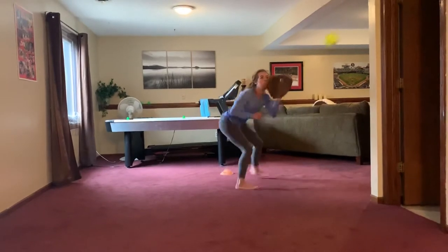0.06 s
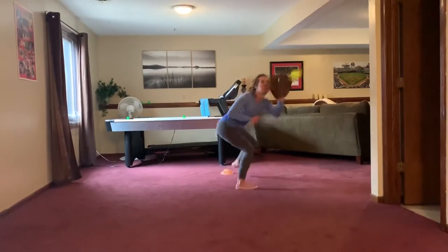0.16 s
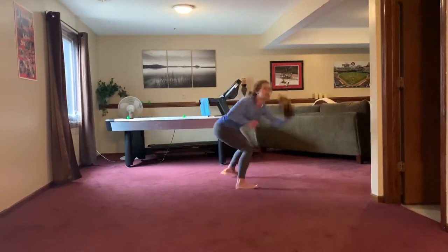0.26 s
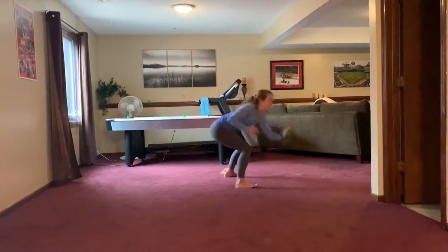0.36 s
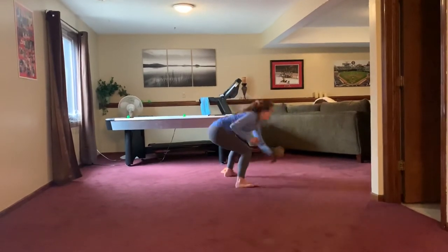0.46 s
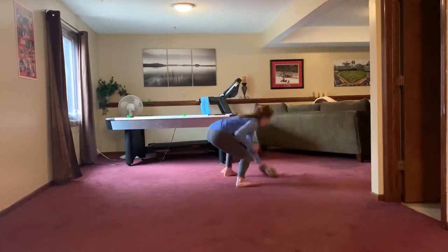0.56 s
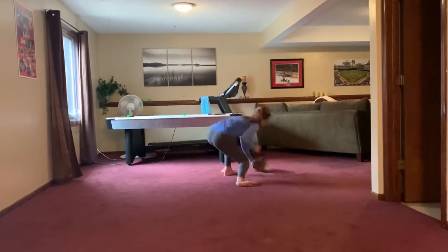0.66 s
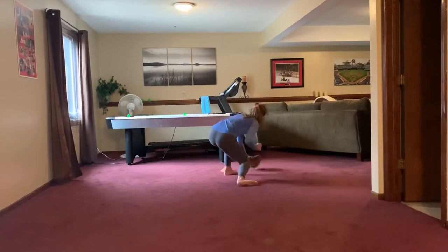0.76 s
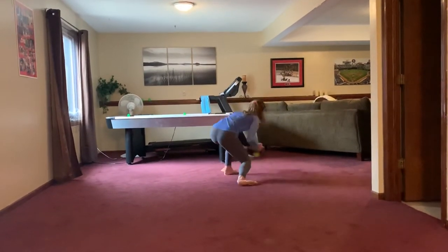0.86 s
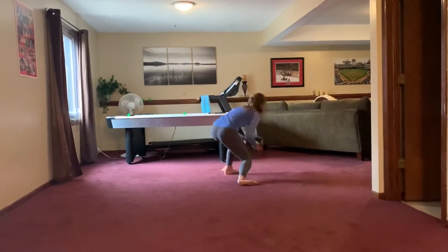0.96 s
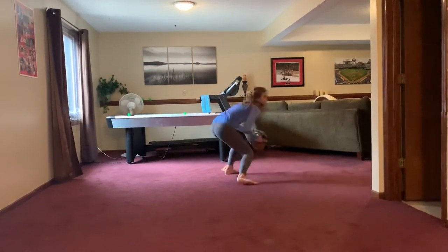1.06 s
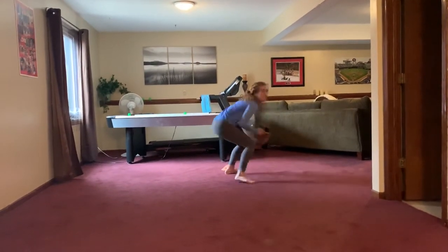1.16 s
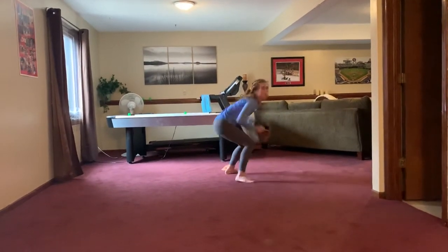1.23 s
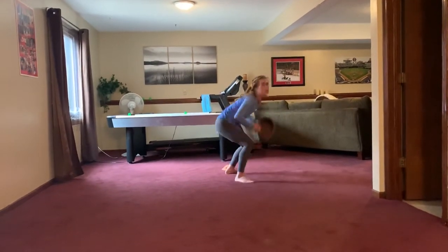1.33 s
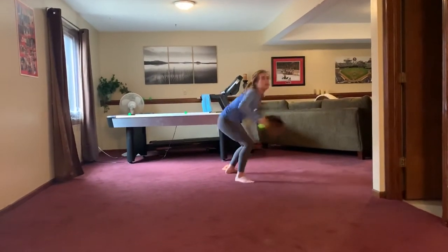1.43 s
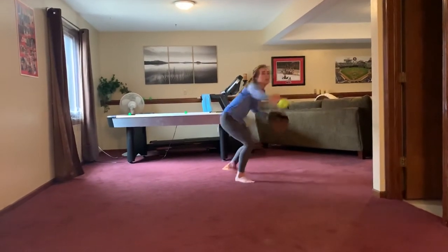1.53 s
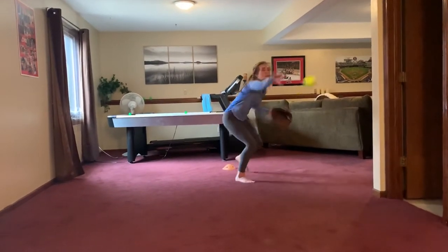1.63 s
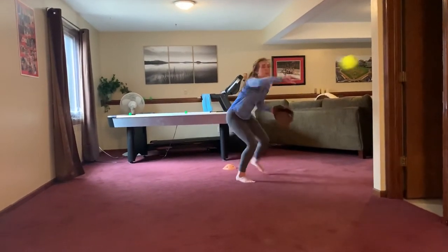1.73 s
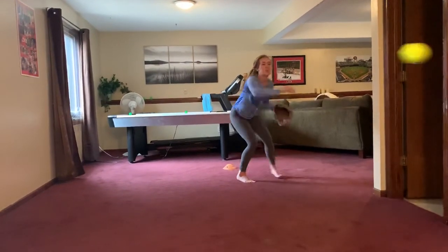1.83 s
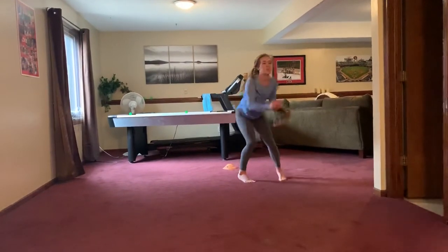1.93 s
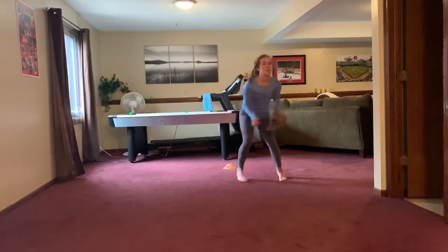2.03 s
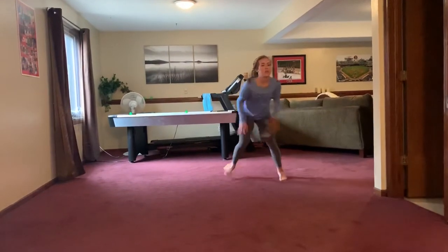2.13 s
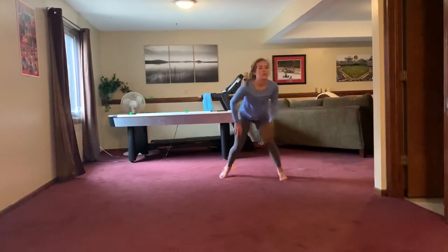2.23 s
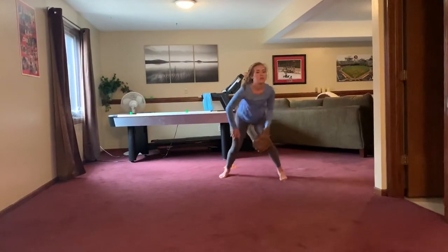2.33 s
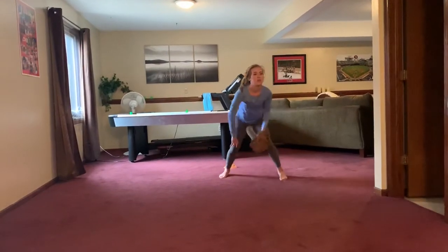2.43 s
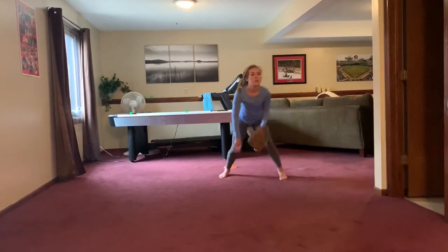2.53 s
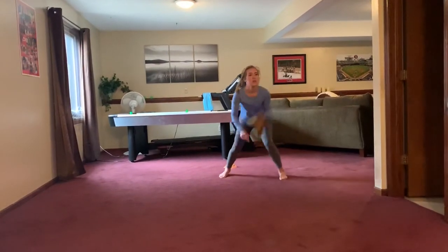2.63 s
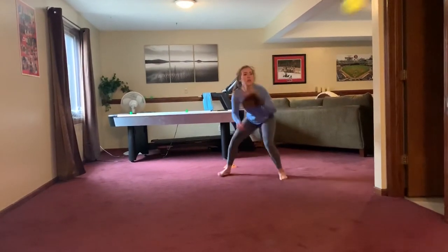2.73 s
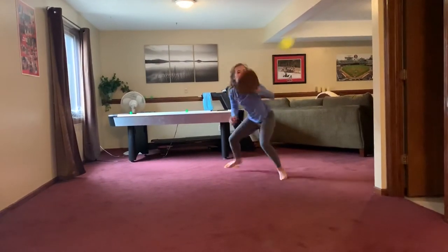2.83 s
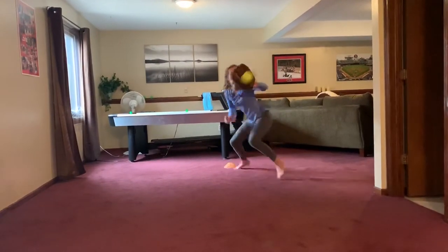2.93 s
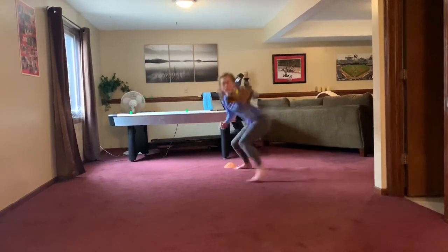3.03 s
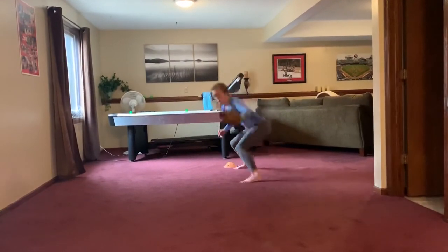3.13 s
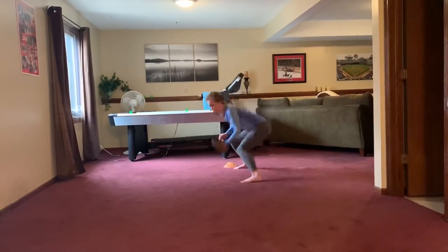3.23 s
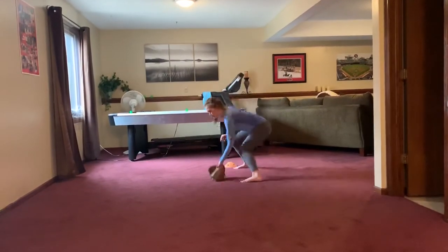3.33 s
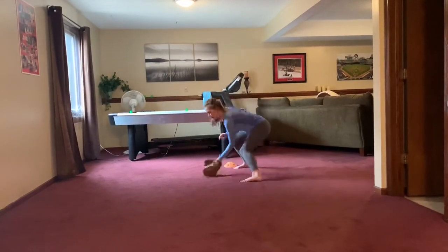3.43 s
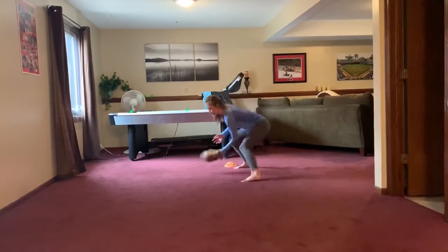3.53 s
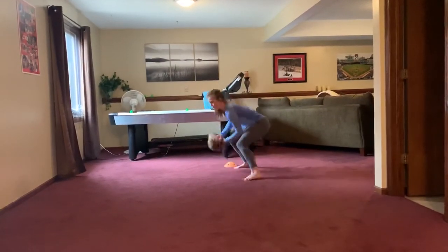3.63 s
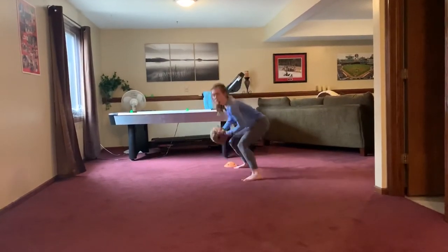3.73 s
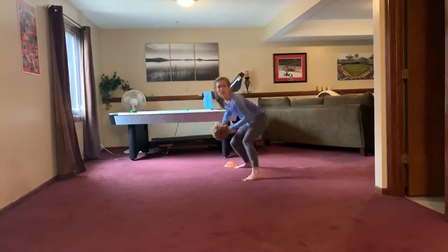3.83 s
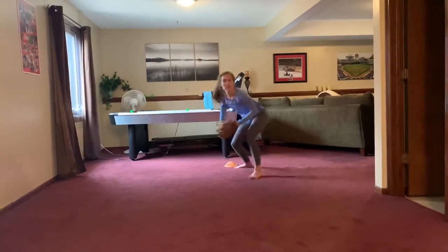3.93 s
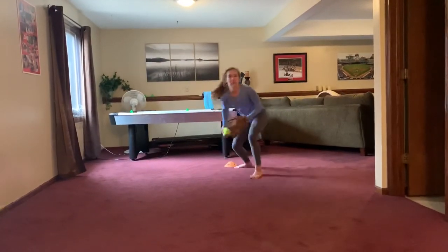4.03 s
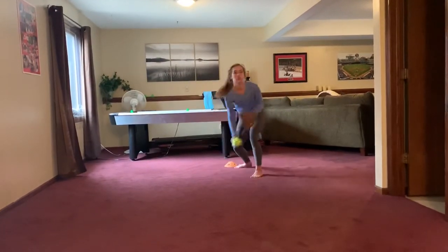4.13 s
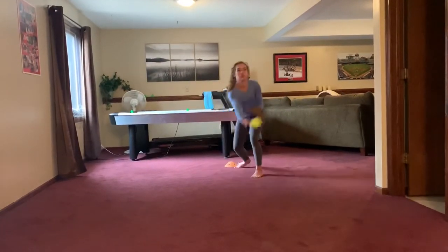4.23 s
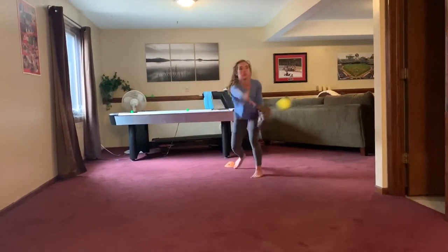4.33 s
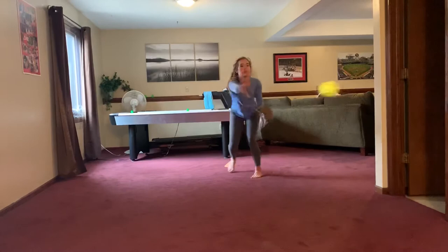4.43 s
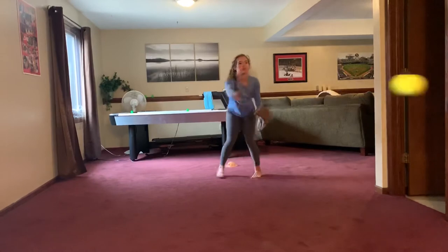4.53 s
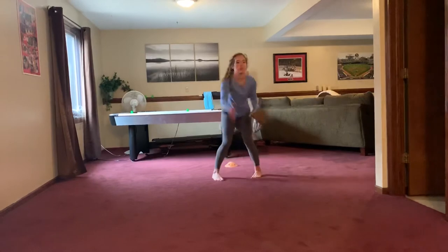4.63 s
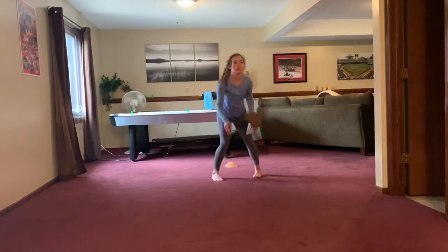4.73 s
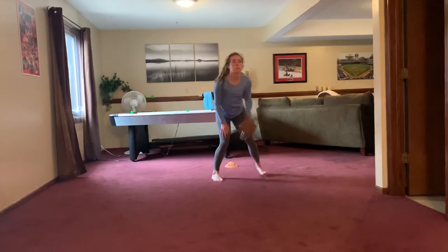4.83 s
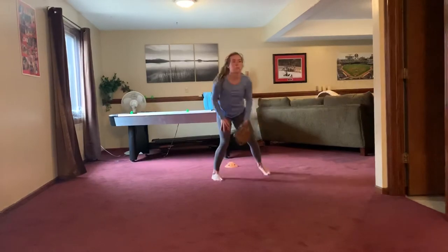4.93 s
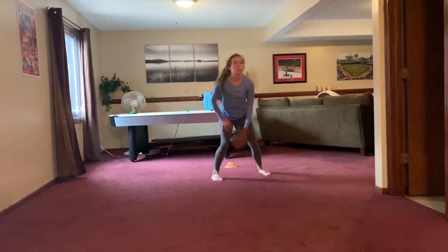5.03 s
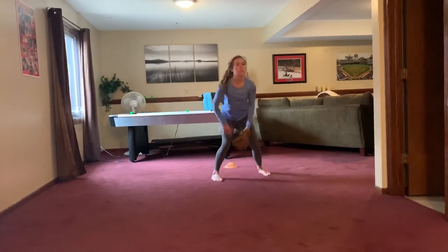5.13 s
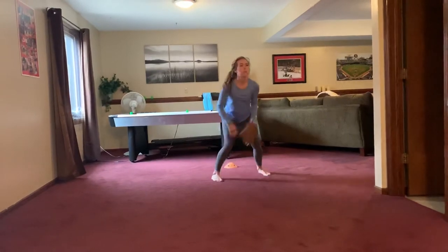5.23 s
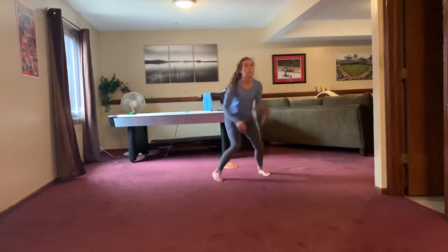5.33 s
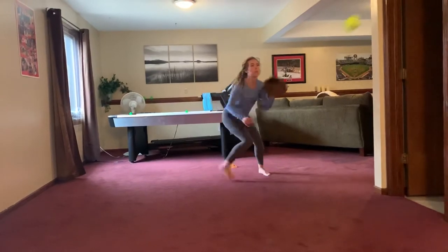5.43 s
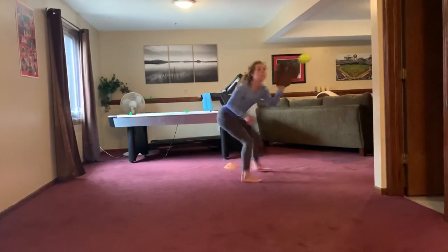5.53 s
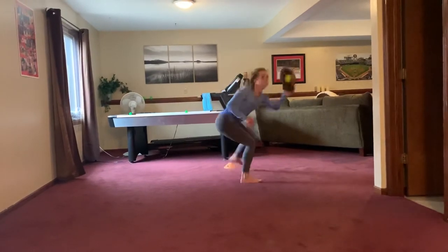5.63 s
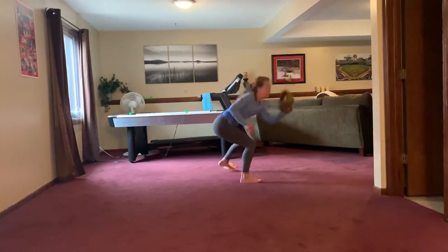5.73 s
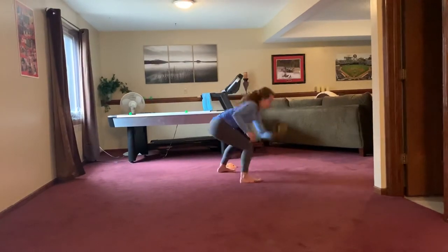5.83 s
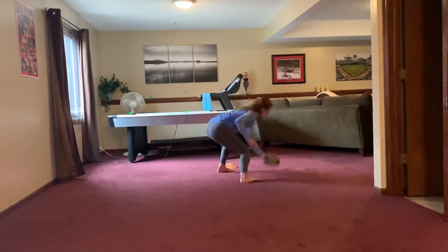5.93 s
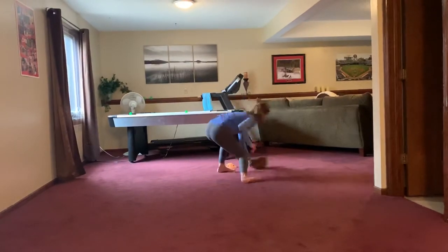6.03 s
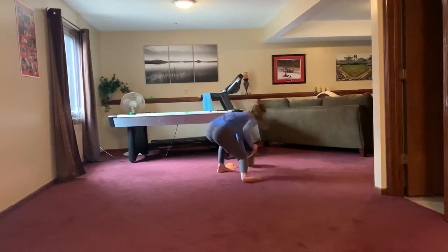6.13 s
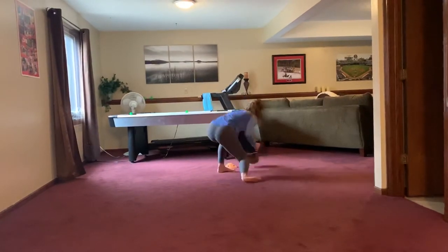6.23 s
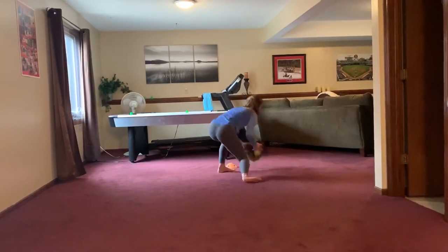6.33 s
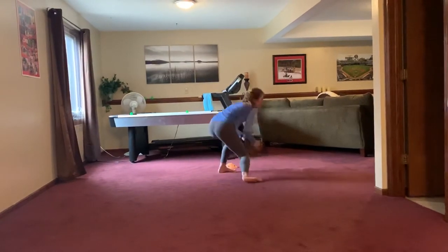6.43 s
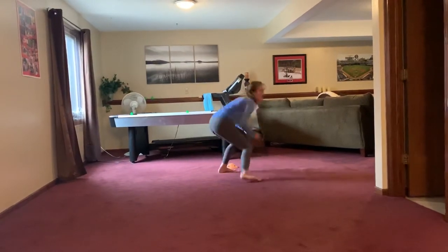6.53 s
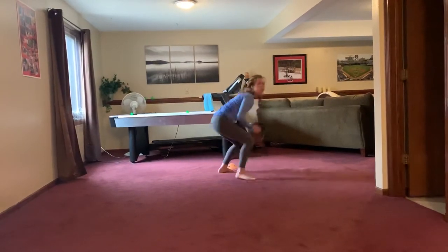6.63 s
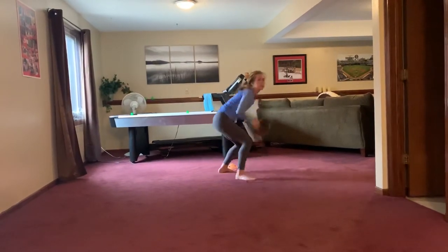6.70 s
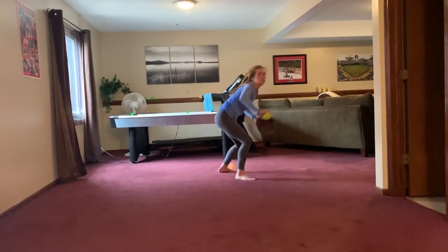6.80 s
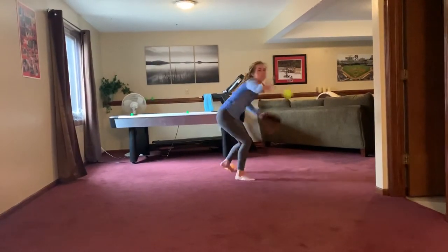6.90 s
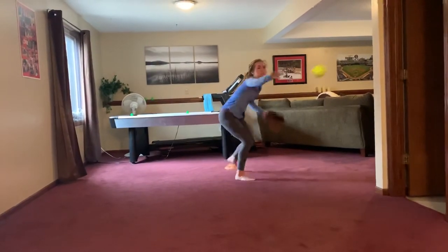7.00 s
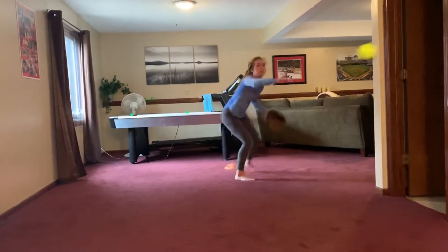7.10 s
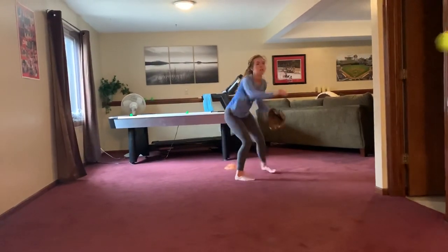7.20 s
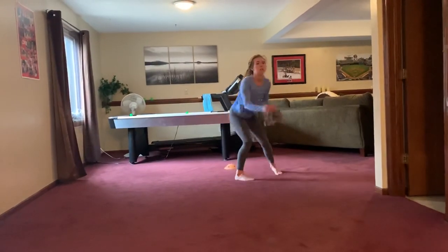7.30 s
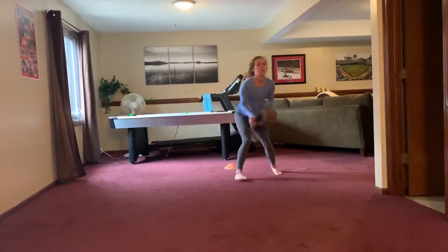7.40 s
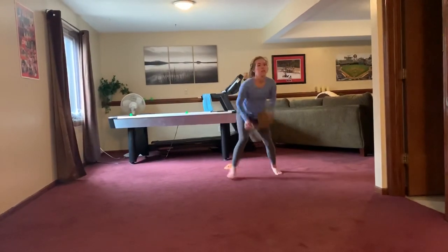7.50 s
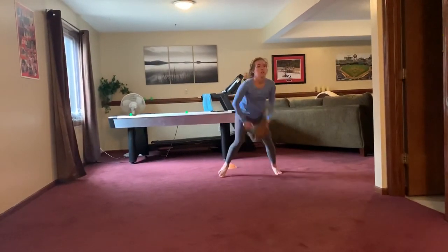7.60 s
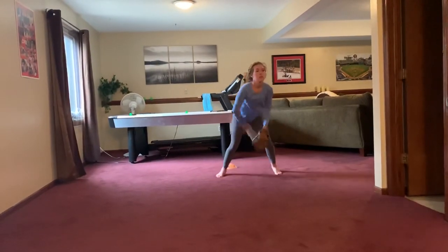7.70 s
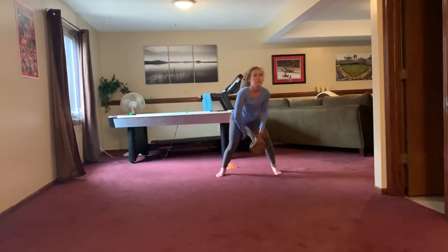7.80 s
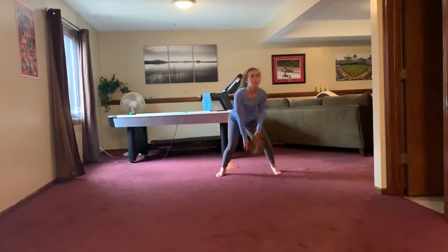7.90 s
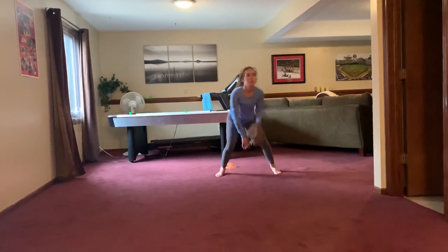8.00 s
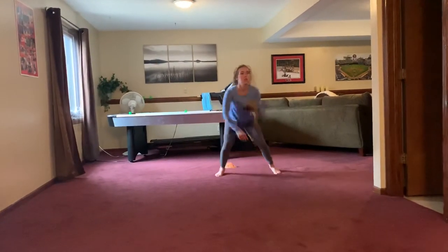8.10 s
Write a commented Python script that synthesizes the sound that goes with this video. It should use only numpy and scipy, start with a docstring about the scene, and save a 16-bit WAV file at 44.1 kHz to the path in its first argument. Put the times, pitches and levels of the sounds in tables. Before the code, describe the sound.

A steady low rumble with a motor hum and light hiss fills a basement-like room. Over it, a ball cracks into a leather glove every second or so, the loudest about two seconds in, others softer. Muted glove-on-carpet thuds follow three of the catches, with faint pats, clothing rustle, foot shuffles and leather creaks between throws. One dull boxy knock comes past the middle. Short room reflections, stationary stereo microphone.

```python
"""Ball toss in a carpeted room.

Two players toss a ball in a long carpeted room with a low ceiling. Catches, tags, pats and a boxy
knock are short noise bursts that ring resonances, echoes and a diffuse tail. Cloth and bare feet shuffle
as grainy noise, glove leather creaks as wavering resonant noise. Ventilation rumble fills the lowest
room modes, over a motor hum and a steady hiss."""
import sys
import numpy as np
from scipy import signal
from scipy.io import wavfile

SR = 44100
rng = np.random.default_rng(int(sys.argv[2]) if len(sys.argv) > 2 else 0)


def store_pcm(level_fs):
    """Save levels as 16-bit WAV."""
    pcm = np.round(np.clip(level_fs, -1, 1) * 32767).astype(np.int16)
    wavfile.write(sys.argv[1], SR, np.atleast_2d(pcm).T)


def gain_from_decibels(decibels):
    """Convert decibel values to linear amplitude factors."""
    exponent = np.asarray(decibels, float) / 20
    return 10 ** exponent


N = 359767

# Ball into glove. Each row: start in seconds, pocket pop in dB, tilt of the pocket's top in dB,
# then in dB relative to the pop: push, palm, fingers, crack, snap.
CATCHES = [(0.23, -14, -4, -11, -13, -8.5, -14.5, -17.5), (1.941, -8, 0.5, -17, -9.5, -12.5, -12, -16.5),
           (2.958, -30, -4, -1, -5.5, -1.5, 0, 0.5), (2.981, -25.5, 0.5, -5.5, -3, -7.5, -9.5, -12),
           (4.617, -24.5, -8, -10.5, -9, -5, -15.5, -10), (4.637, -22, -0.5, -8, -17, -2, -17.5, -17),
           (5.603, -15, -0.5, -8.5, -9, -10, -15, -16), (7.281, -15, -3.5, -9, -9, -9.5, -14.5, -16.5)]
# Glove with the ball tags the carpet. Each row: start in seconds, pocket pop in dB,
# then in dB relative to the pop: push, low thud, high thud, crack, snap.
TAGS = [(0.573, -42.5, 11.5, 10, 11.5, -15, -16), (3.339, -39, 17, 14, 12, -10.5, -16),
        (5.984, -40.5, 8.5, 14.5, 9, -15, -18.5)]
# Light pats of hand, ball and leather, too light to push air. Each row: start in seconds,
# pocket pop in dB, then in dB relative to the pop: fingers, crack, snap.
PATS = [(0.893, -53.5, -1, -25, -23), (0.991, -54, -1, -17, -3), (2.381, -48, -33, -1.5, -18),
        (2.421, -57.5, -19.5, -8, -5.5), (2.566, -66, -20, 5.5, 1), (6.423, -62.5, -12, 0, -3),
        (6.464, -64, -12, -10.5, -21), (6.489, -66, -8, -15, -20), (6.506, -55, -11, -10, -9),
        (6.934, -64, -5, -23, -25), (7.801, -62.5, -17, 10, 3.5), (7.818, -59, -17, 8, -6),
        (7.903, -60, 13.5, -6.5, -7.5)]
# Boxy knocks. Each row: start in seconds, level in dB.
KNOCKS = [(4.872, -37)]

# Resonances rung by blows. Each row: centre in Hz, width in Hz, level within its group in dB.
PUSH_MODES = [(72.8, 88, -0.5), (109, 35, 3), (160.9, 23, 0), (203.6, 77, -5)]  # air shoved aside, floor thump
POCKET_MODES = [(735, 250, 1.5), (1144, 340, 1.5), (1536, 419, -1), (2208, 250, -6), (2620, 750, -12)]  # air trapped in the pocket
PALM_MODES = [(191, 88, -0.5), (265.1, 120, -0.5)]  # glove body
FINGER_MODES = [(365, 50, 0), (390, 54, 1), (567, 120, -9.5)]  # glove body
CRACK_MODES = [(3162, 620, 16.5), (5000, 1400, 9)]  # slap of the surfaces
SNAP_MODES = [(5500, 890, 1.5), (9400, 1400, -0.5), (13800, 730, -7.5)]  # brightest edge of the slap
LOW_THUD_MODES = [(255, 70, 3)]  # padded glove against carpet
HIGH_THUD_MODES = [(355, 86, 2.5), (504, 87, -2), (680, 250, -11.5)]  # padded glove against carpet
BOX_MODES = [(770, 650, 6), (1100, 390, 10), (1580, 260, 0), (2370, 450, -1), (3170, 610, -4)]  # body of the boxy knock
POCKET_TOP_HZ, BOX_EDGE_HZ = 1800, 4400

# Faint, dull swell ahead of each blow; level relative to the blow's noise.
LEAD_S, LEAD_DB, LEAD_CUT_HZ = .017, -22, 6000
RIGHT_LAG_S, BASS_PAN_DB = .00045, -1.5

# Wall and far-end echoes. Each row: delay in seconds, level in dB.
ECHOES = [(.0115, -8), (.022, -13), (.045, -11), (.059, -14), (.105, -24)]
# Decay of the diffuse tail. Each row: frequency in Hz, T60 in seconds.
ROOM_T60 = [(60, 0.89), (160, 0.43), (420, 0.38), (1100, 0.39), (2900, 0.47), (7700, 0.35), (15000, 0.095)]
# Colour of the tail. Each row: frequency in Hz, level against the direct sound in dB before ROOM_DB.
ROOM_COLOUR = [(60, 4), (200, 6), (600, 1.5), (1500, 0), (4000, 2.5), (7000, 4), (14000, 8)]
# Lowest room modes. Each row: centre in Hz, width in Hz, relative level in dB.
ROOM_MODES = [(42, 14, -15), (64.5, 7, 0), (83, 14, -9), (101, 11, -2.5), (121, 8, -3), (150, 25, -16)]
ROOM_DB, BUILD_UP_S = -17, .008
LUMPS_DB = 3.5  # furniture and alcoves make the tail arrive in lumps
CATCH_RING_DB, TAG_RING_DB = 4, 6  # drive of the room modes by blows in the air, on the floor

# Movements of cloth, leather or feet. Each row: time of full rub in seconds, hold in seconds,
# rustle in dB, extra treble in dB.
MOVES = [(0.0, 0.055, -60.5, -2), (0.542, 0.042, -64.5, 1.5), (0.66, 0.027, -63, -9),
         (0.89, 0.028, -74, -2), (0.97, 0.047, -66.5, 7), (1.13, 0.077, -67, 7), (1.25, 0.047, -80, 16),
         (1.36, 0.018, -72.5, 7), (1.54, 0.052, -76.5, 2.5), (1.788, 0.016, -70.5, 7),
         (1.891, 0.095, -69, 3), (2.33, 0.027, -76, 0.5), (2.385, 0.023, -68, 13), (2.5, .08, -79, 17.5),
         (2.729, 0.095, -73.5, 0), (2.892, 0.1, -65.5, -2), (3.597, 0.015, -58, 0.5),
         (3.699, 0.018, -69, 8), (3.79, 0.012, -74, 3.5), (3.9, 0.047, -67.5, 2.5), (3.981, .02, -64, 1),
         (4.2, .1, -88, 8.5), (4.35, 0.007, -70, -2), (4.583, 0.044, -68.5, -1), (5.171, 0.036, -78, 7),
         (5.31, 0.033, -75.5, -12), (5.405, .01, -64.5, -0.5), (5.503, 0.11, -62, -1.5),
         (5.921, 0.11, -67.5, 7), (6.08, 0.025, -60.5, -11), (6.288, 0.025, -81.5, 1.5),
         (6.42, 0.0081, -77.5, 5), (6.47, 0.19, -65, -3), (6.769, .07, -71.5, -1.5),
         (6.899, 0.051, -84, 5.5), (7.639, 0.031, -64.5, -1), (7.833, 0.011, -62, 6.5),
         (7.925, 0.019, -72, 12.5), (8.001, 0.096, -84.5, -10.5)]
# Rustle spectrum. Each row: frequency in Hz, relative density in dB per Hz.
CLOTH = [(240, -28.5), (400, -2.5), (771, -5.5), (960, -4.5), (1130, -7.5), (1240, -12), (1800, -12),
         (2240, -11.5), (10500, -38), (13600, -51), (22000, -120)]
# Glove flexes. Each row: time of full creak in seconds, hold in seconds, level in dB.
FLEXES = [(0.89, 0.14, -70), (1.13, 0.061, -67.5), (1.36, 0.034, -70), (1.79, 0.024, -79.5),
          (2.49, 0.11, -73.5), (2.729, 0.067, -81), (3.62, 0.026, -62), (3.78, 0.021, -74.5),
          (3.92, 0.069, -63), (5.06, 0.1, -83), (5.4, 0.28, -75.5), (6.29, 0.032, -89),
          (6.501, 0.18, -69.5), (6.78, 0.042, -82), (7.83, 0.087, -76)]
# Creaking leather. Each row: centre in Hz, width in Hz, relative level in dB.
CREAK_MODES = [(1586, 260, 2.5), (2146, 280, -1), (2700, 300, -3), (3316, 260, -5), (4700, 400, -8)]
RISE_DB_PER_S, FALL_DB_PER_S = 353, 166.5
FIDGET_DB = -98  # faint rustle that never stops

# Rumble skirt and microphone hiss. Each row: frequency in Hz, relative density in dB per Hz.
AIR = [(88, -32.5), (150, -15), (182, -7.5), (249, -9), (612, -34), (4490, -44), (7320, -62.5), (9260, -35),
       (10600, -67), (11500, -74.5), (12700, -54), (14000, -44.5), (16000, -58.5)]
AIR_DB, HUM_DB, MOTOR_HZ, MOTOR_DB = -62.5, -46.5, 121.7, -61.5

# Stereo likeness. Each row: frequency in Hz, left-right likeness (1 alike, -1 opposed).
LIKENESS = [(60, 1), (130, 0.3), (290, .5), (640, -0.62), (1410, 0.12), (3100, 0.06), (15000, 0.38)]
# Noise band edges. Each entry: frequency in Hz.
EDGES_HZ = np.append(40 * 2 ** np.arange(0, 8.1, .5), [12600, 15600])


def catches():
    """Ball smacks into leather: the depth of the catch tilts the pocket's upper resonances."""
    rows = []
    for s, pop_db, top_db, *rel_db in CATCHES:
        pocket = [(hz, width_hz, db + top_db * (hz > POCKET_TOP_HZ)) for hz, width_hz, db in POCKET_MODES]
        others = zip([PUSH_MODES, PALM_MODES, FINGER_MODES, CRACK_MODES, SNAP_MODES], pop_db + np.array(rel_db))
        rows.append((s, [(pocket, pop_db), *others]))
    return blows(rows, contact_ms=8.53)


def pats():
    """Light touches: short contact rings pocket, fingers and slap, without an air push."""
    return blows(glove(PATS, [FINGER_MODES, CRACK_MODES, SNAP_MODES]), contact_ms=4.5)


def knock():
    """Boxy knock: long contact rings the box modes, low-passed to leave no bright edge."""
    dull = signal.butter(5, BOX_EDGE_HZ, fs=SR, output="sos")
    return signal.sosfilt(dull, blows([(s, [(BOX_MODES, db)]) for s, db in KNOCKS], contact_ms=13.0))


def tags():
    """Glove tags the carpet: padded contact rings the floor push and two thuds."""
    groups = [PUSH_MODES, LOW_THUD_MODES, HIGH_THUD_MODES, CRACK_MODES, SNAP_MODES]
    return blows(glove(TAGS, groups), contact_ms=9.4)


def glove(rows, groups):
    """Pairs the pocket and the other resonance groups with their levels."""
    return [(s, [(POCKET_MODES, pop_db), *zip(groups, pop_db + np.array(rel_db))])
            for s, pop_db, *rel_db in rows]


def blows(rows, contact_ms):
    """Each blow rings its resonance groups, each cut steeply above its top mode."""
    out, size = np.zeros((2, N)), round(.5 * SR)
    click = signal.unit_impulse(4096)
    lag = round(RIGHT_LAG_S * SR)
    for (s, groups), tail in zip(rows, room_tails(len(rows), size)):
        contact, late = arrival(contact_ms, tail)
        at = round((s - LEAD_S) * SR)
        for modes, db in groups:
            soft = signal.butter(3, min(1.5 * modes[-1][0], .45 * SR), fs=SR, output="sos")
            direct = resonances(contact, modes)
            direct = direct * np.linalg.norm(contact) / np.linalg.norm(direct)
            reverb = resonances(late, modes) / np.linalg.norm(resonances(click, modes))
            heard = reverb + [direct, np.roll(direct, lag)]
            out[:, at:at + size] += gain_from_decibels(db) * signal.sosfilt(soft, heard)[:, :N - at]
    return out


def arrival(contact_ms, tail):
    """A few ms of uneven contact noise; after it, echoes and the diffuse tail."""
    t = np.arange(tail.shape[1]) / SR
    hump = np.exp(-(t / (contact_ms / 1000)) ** 3) * (1 - np.exp(-t / .0015))
    contact = rng.standard_normal(len(t)) * hump
    contact = contact * np.linalg.norm(hump) / np.linalg.norm(contact)
    # the tail keeps the chance colour of its blow
    uneven = .4 * contact[:1024] / np.linalg.norm(contact)
    tail = tail + signal.fftconvolve(tail, uneven[None], axes=1)[:, :len(t)]
    # each echo is a fresh burst, dulled by the walls
    echo_gain = sum(gain_from_decibels(db) * np.roll(hump, round(s * SR)) for s, db in ECHOES)
    echo_noise = signal.lfilter([.8], [1, -.2], rng.standard_normal(tail.shape))
    late = gain_from_decibels(ROOM_DB) * tail + echo_gain * echo_noise
    lead = round(LEAD_S * SR)
    dull = signal.butter(4, LEAD_CUT_HZ, fs=SR, output="sos")
    lead_noise = signal.sosfilt(dull, rng.standard_normal(lead))
    swell_in = gain_from_decibels(LEAD_DB) * np.linspace(0, 1, lead) * lead_noise
    return np.append(swell_in, contact[:-lead]), np.pad(late, [(0, 0), (lead, 0)])[:, :-lead]


def room_tails(count, size):
    """Diffuse tails that die band by band; the players move, so every blow gets another one."""
    t = np.arange(size) / SR
    tails = 0
    for hz, noise in bands(count * size):
        lumps_db = LUMPS_DB * drift(260)[:count * size].reshape(count, size)
        decay_db = at_hz(ROOM_COLOUR, hz) - 60 * t / at_hz(ROOM_T60, hz)
        tails = tails + noise.reshape(2, count, size) * gain_from_decibels(lumps_db + decay_db)
    return np.swapaxes(tails * (1 - np.exp(-t / BUILD_UP_S)), 0, 1)


def shuffle():
    """Rubbing cloth and carpet: noise roughened by fibre grains, its colour shifting in patches."""
    s, held_s, db, treble_db = np.transpose(MOVES)
    level = gain_from_decibels(FIDGET_DB) + swell(s, held_s, db)
    treble = gain_from_decibels(FIDGET_DB) + swell(s, held_s, db + treble_db)
    grains = gain_from_decibels(3.5 * drift(200))
    out = 0
    for hz, noise in bands(N):
        if hz > 300:
            colour = gain_from_decibels(3.5 * drift(900) + at_hz(CLOTH, hz))
            # extra treble sets in at 2500 Hz, full from 5000 Hz
            tilt = (treble / level) ** np.clip(np.log2(hz / 2500), 0, 1)
            out = out + noise * colour * tilt
    reference = signal.sosfilt(signal.butter(2, [600, 3000], "band", fs=SR, output="sos"), out)
    return level * grains * out / np.std(reference)


def creak():
    """Flexing leather: noise in resonances that come and go one by one."""
    rings = 0
    for hz, width_hz, db in CREAK_MODES:
        once = resonances(rng.standard_normal((2, N)), [(hz, width_hz, db)])
        twice = resonances(once, [(hz, width_hz, 0)])
        rings = rings + gain_from_decibels(5.5 * drift(1500)) * twice
    return swell(*np.transpose(FLEXES)) * rms_one(rings)


def hum():
    """Ventilation rumble in the lowest room modes, nearly alike left and right; a motor hums at twice mains."""
    rumble = resonances(rng.standard_normal((2, N)), ROOM_MODES)
    mid, side = resonances(rumble, [(84.0, 120, 0)])
    tone = np.sqrt(2) * np.sin(2 * np.pi * MOTOR_HZ * np.arange(N) / SR)
    motor = gain_from_decibels(MOTOR_DB + 1.0 * drift(6000)) * tone
    return gain_from_decibels(HUM_DB) * rms_one(mid + gain_from_decibels(-13.5) * side * [[1], [-1]]) + motor


def air():
    """Steady floor: shaped noise for the rumble's skirt and the microphone hiss."""
    return gain_from_decibels(AIR_DB) * rms_one(sum(noise * gain_from_decibels(at_hz(AIR, hz)) for hz, noise in bands(N)))


def swell(s, held_s, db):
    """Summed gain of movements that swell quickly, hold and die with the room, linearly in dB."""
    t, out = np.arange(N) / SR, np.zeros(N)
    for start, hold, peak_db in zip(s, held_s, db):
        near = slice(max(round((start - .3) * SR), 0), round((start + hold + .5) * SR))
        rise_db = RISE_DB_PER_S * np.maximum(start - t[near], 0)
        fall_db = FALL_DB_PER_S * np.maximum(t[near] - start - hold, 0)
        out[near] += gain_from_decibels(peak_db - rise_db - fall_db)
    return out


def drift(size):
    """Slow chance of spread about 1: random knots every size samples, joined by lines."""
    knots = rng.standard_normal(N // size + 2)
    return np.interp(np.arange(N) / size, np.arange(len(knots)), knots)


def bands(size):
    """Yields (Hz, noise): half-octave stereo bands with the likeness of a close microphone pair."""
    white = rng.standard_normal((2, 2, size))
    for k, (low, high) in enumerate(zip(EDGES_HZ, EDGES_HZ[1:])):
        band = signal.butter(2, [low, high], "band", fs=SR, output="sos")
        mid, side = signal.sosfilt(band, white[k % 2])
        hz = np.sqrt(low * high)
        alike = np.clip(at_hz(LIKENESS, hz), -1, 1)
        yield hz, np.sqrt(1 + alike) * mid + np.sqrt(1 - alike) * side * [[1], [-1]]


def resonances(x, modes):
    """Parallel two-pole resonances with alternating signs."""
    out = 0
    for k, (hz, width_hz, db) in enumerate(modes):
        r = np.exp(-np.pi * width_hz / SR)
        zeros = [(1 - r * r) / 2, 0, (r * r - 1) / 2]
        poles = [1, -2 * r * np.cos(2 * np.pi * hz / SR), r * r]
        out = out + (-1) ** k * gain_from_decibels(db) * signal.lfilter(zeros, poles, x)
    return out


def at_hz(points, hz):
    """Reads a spectrum table on a log-frequency axis."""
    table_hz, values = np.array(points).T
    return np.interp(np.log(hz), np.log(table_hz), values)


def rms_one(x):
    """Scales to rms 1."""
    return x / np.sqrt(np.mean(x ** 2) + 1e-20)


def scene():
    """Sums all sources; blows make the lowest room modes ring on."""
    in_air = catches() + pats()
    boxy = knock()
    on_floor = tags()
    thumps = gain_from_decibels(CATCH_RING_DB) * in_air + gain_from_decibels(TAG_RING_DB) * on_floor
    ring = resonances(thumps.mean(axis=0), ROOM_MODES)
    return in_air + boxy + on_floor + ring + shuffle() + creak() + hum() + air()


def low_pass(x):
    """Removes everything above the highest recorded frequency."""
    return signal.sosfilt(signal.butter(12, 16490, fs=SR, output="sos"), x)


def record(dry):
    """Less bass on the left, more on the right; deepest bass and top are cut."""
    bass = signal.sosfilt(signal.butter(1, 350, fs=SR, output="sos"), dry)
    mix = dry + bass * (gain_from_decibels([[BASS_PAN_DB / 2], [-BASS_PAN_DB / 2]]) - 1)
    mix = signal.sosfilt(signal.butter(2, 32, "high", fs=SR, output="sos"), mix)
    mix = signal.sosfilt(signal.cheby2(10, 50, 16400, fs=SR, output="sos"), mix)
    return low_pass(mix)


dry = scene()
out = record(dry)
store_pcm(out)
```